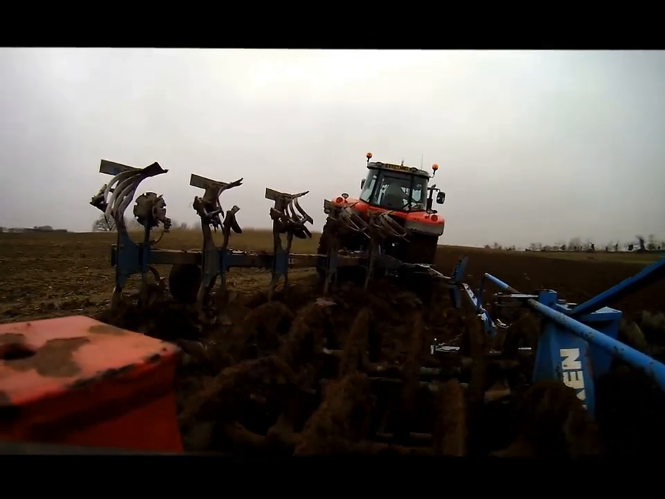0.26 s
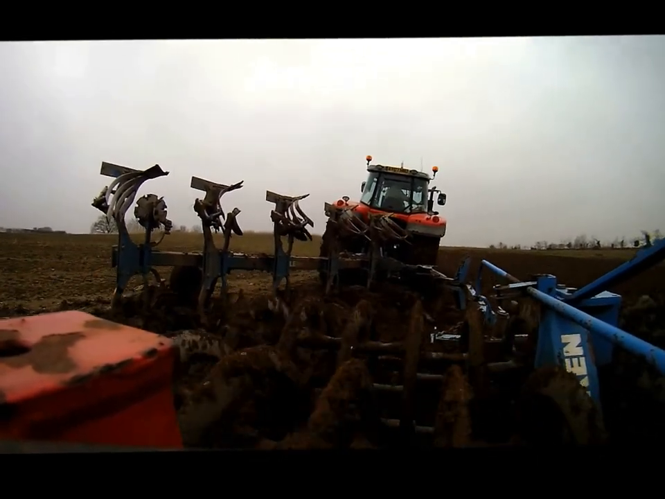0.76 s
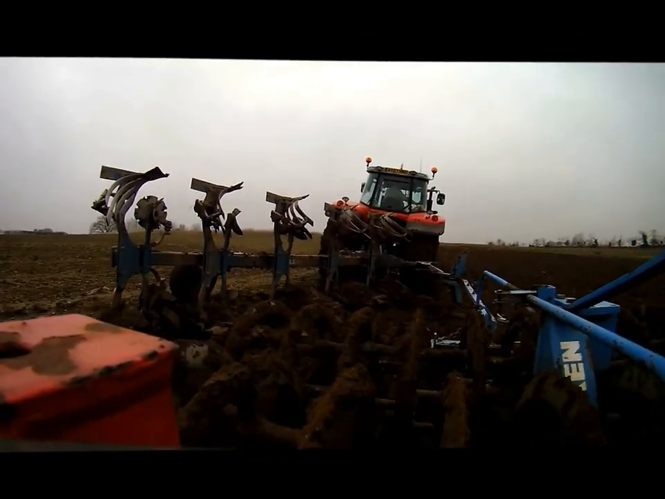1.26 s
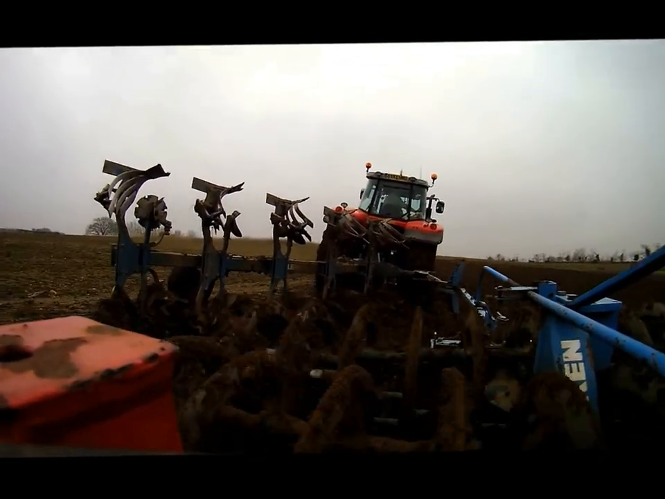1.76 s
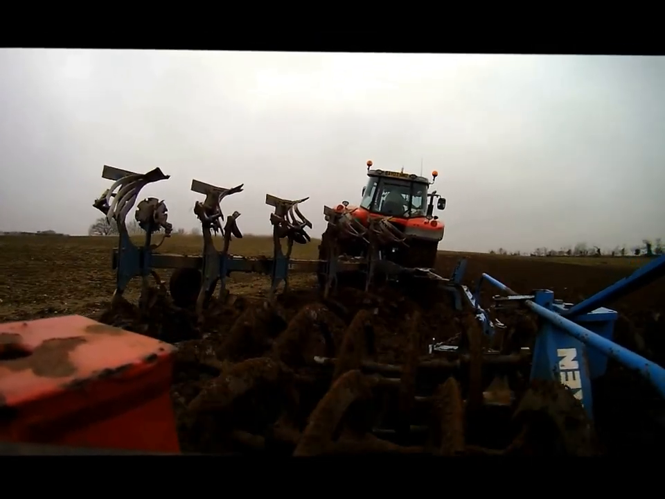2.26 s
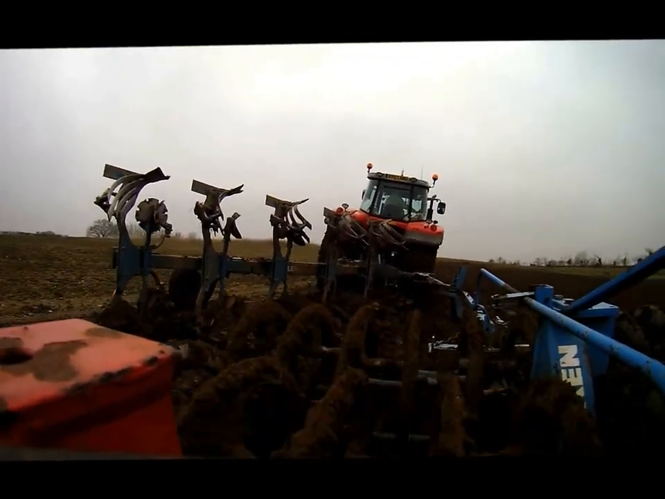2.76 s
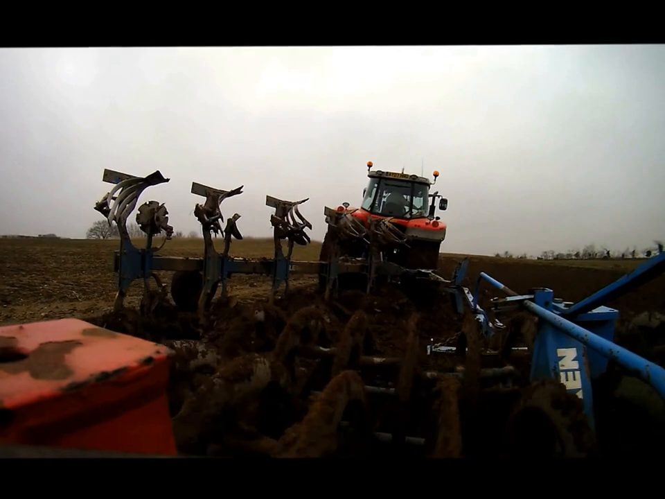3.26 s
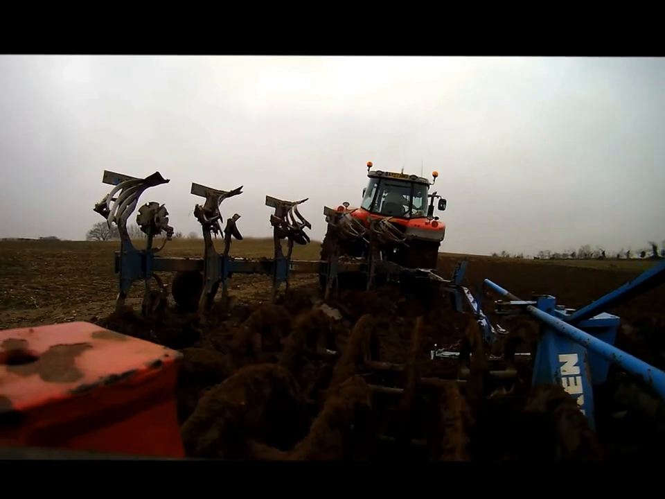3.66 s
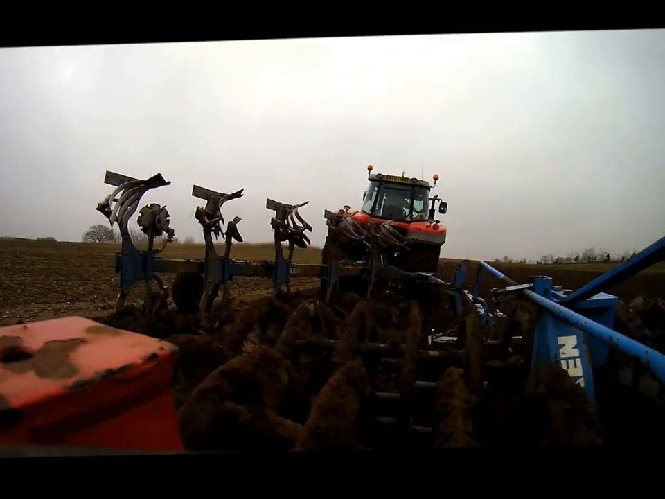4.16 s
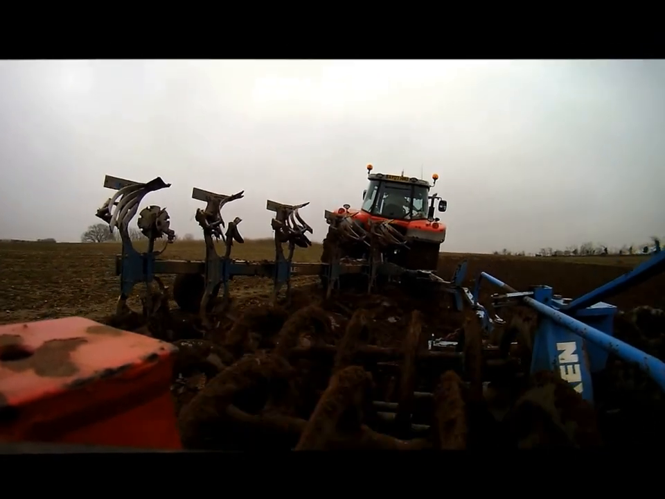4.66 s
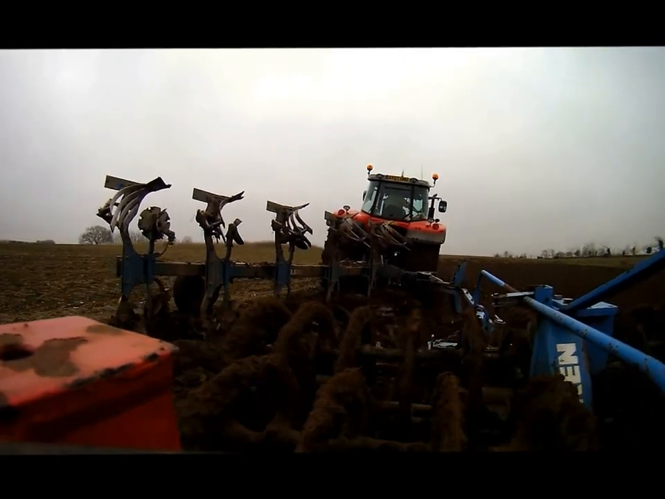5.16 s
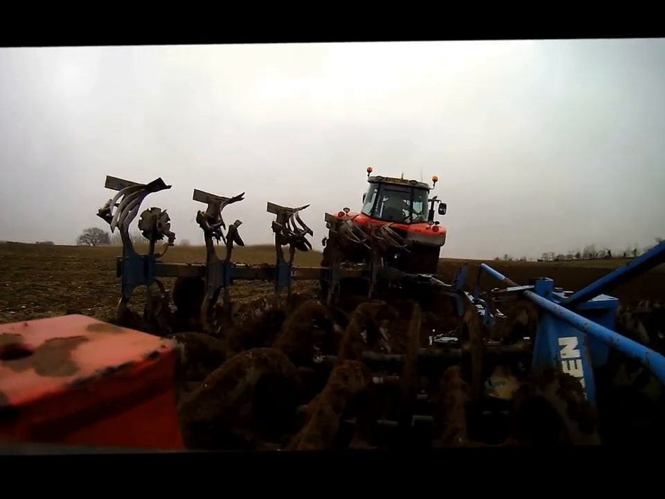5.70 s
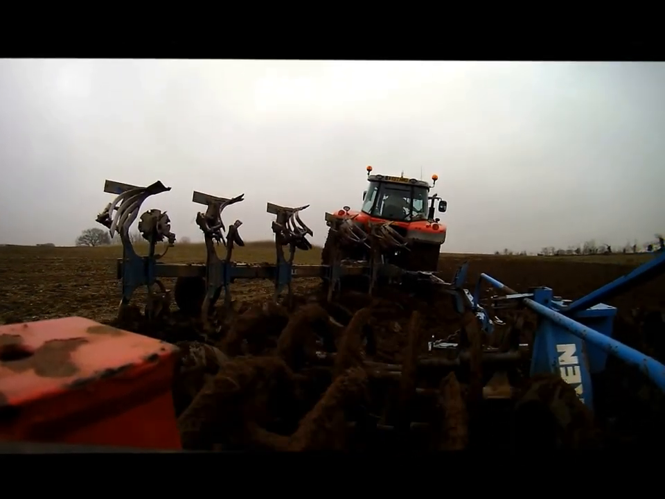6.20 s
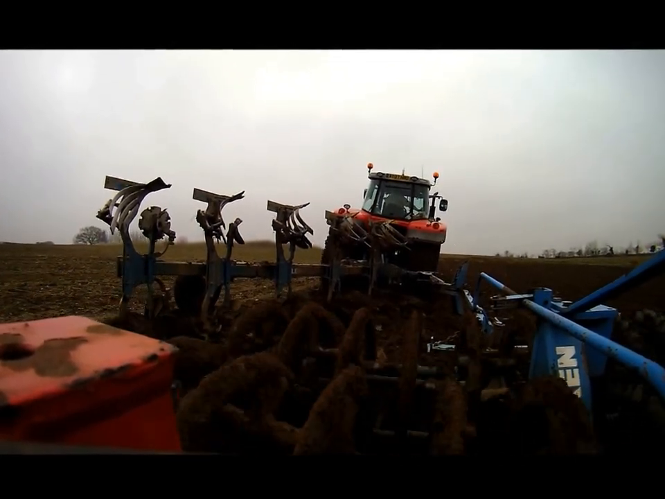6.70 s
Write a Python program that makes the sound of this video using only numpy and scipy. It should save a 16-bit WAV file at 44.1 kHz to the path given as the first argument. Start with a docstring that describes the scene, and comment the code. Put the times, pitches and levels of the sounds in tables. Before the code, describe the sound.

Heard through a steel farm frame rolling over ploughed earth: throbbing bass hum, crumbly grinding, scattered clanks and a single overloaded bang.

```python
"""A low, surging drone runs throughout under grinding soil and scattered knocks, with one hard, overloaded slam
about a third of the way in: a camera clamped to the steel frame of a furrow press hears mostly through its mount
as the rings roll over ploughed soil.
Two wavering near-sines make the drones, and coloured noise and clicks make the soil, thuds and snaps.
Knocks ring the modes of the frame with short bursts of chatter."""
import sys
import numpy as np
from scipy import signal
from scipy.fft import rfft, irfft, next_fast_len
from scipy.io import wavfile
from scipy.ndimage import uniform_filter1d

SR = 44100
rng = np.random.default_rng(int(sys.argv[2]) if len(sys.argv) > 2 else 0)


def linear_from_db(decibels):
    """Turn decibels (scalar or array-like) into linear amplitude factors; 0 gives 1."""
    return 10 ** (np.asarray(decibels, float) / 20)


def unload_audio(sound):
    """Save the sound as a 16-bit wav file, at the path given as the first command line argument."""
    columns = np.transpose(np.atleast_2d(sound))
    # keep every value between -1 and 1, then stretch to whole-number steps
    steps = np.round(np.clip(columns, -1, 1) * 32767)
    wavfile.write(sys.argv[1], SR, steps.astype(np.int16))


N = 306054

# What the frame and housing ring with.
# Each row: pitch in Hz, relative level in dB, basic time to fall by 60 dB in seconds.
FRAME = [(526, 2.5, 0.24), (581.5, -2.5, 0.21), (750, -22, 0.02), (750, -8.5, .05), (997, 5, 0.25),
         (956, 13.5, 0.078), (1120, -21.5, .08), (1286, -18, 0.066), (1300, -14, 0.087), (1370, 10, 0.15),
         (1400, 7, 0.2), (1448, 15.5, 0.059), (1530, 19, 0.12), (1570, -8, 0.092), (1748, 5.5, 0.066),
         (1838, -3.5, 0.088), (2130, -4, 0.089), (2240, -6.5, 0.092), (2482, -6, 0.2), (2745, -5, 0.055),
         (2988, -2.5, 0.18), (3019, 2, 0.13), (3263, -7, 0.097), (3387, -5.5, 0.22), (3514, -2, 0.16),
         (3778, 0, 0.038), (3975, -24, 0.026), (4400, -14.5, 0.1), (4616, -13.5, .22), (4890, -16.5, 0.11),
         (5390, -19, 0.12)]
# Tone colour of the low rumble through the housing.
# Each row: frequency in Hz, relative level in dB per Hz.
RUMBLE_COLOUR = [(12, -53.5), (20, -12), (73, -6), (95, -13), (119, -16), (146, -16.5), (243, -17),
                 (302, -13), (365, -41.5), (420, -48), (550, -66), (920, -120)]


def curve(table):
    """Draw straight lines between the rows of a table, giving each column sample by sample."""
    seconds, *columns = np.transpose(table)
    return [np.interp(np.arange(N) / SR, seconds, column) for column in columns]


def unit(x):
    """Scale a sound to an rms of 1."""
    return x / np.sqrt(np.mean(x ** 2))


def decay(t, t60):
    """Die away steadily, by 60 dB in t60 seconds."""
    return np.exp(-np.log(1000) * t / t60)


def colour(x, points):
    """Shape the spectrum of a sound by points of (Hz, dB)."""
    hz, db = np.transpose(points)
    size = next_fast_len(len(x))
    f = np.maximum(np.arange(size // 2 + 1) * SR / size, 1)
    gain = linear_from_db(np.interp(np.log(f), np.log(hz), db))
    return irfft(rfft(x, size) * gain, size)[:len(x)]


def walk(rate):
    """Wander at random with rms 1: a new value each 1 / rate seconds, smoothed twice."""
    hold = int(SR / rate)
    steps = np.repeat(rng.standard_normal(N // hold + 1), hold)
    smooth = uniform_filter1d(uniform_filter1d(steps, hold), hold)
    return unit(smooth[:N])


def grains(per_s, spread_db):
    """Scatter clicks at random, most of them small and a few large."""
    clicks = (rng.random(N) < per_s / SR) * rng.standard_normal(N)
    return unit(clicks * linear_from_db(spread_db * rng.exponential(size=N)))


def surges(table, rise_s, fall_s):
    """Let each surge swell, sag for its length and then die away smoothly."""
    out = np.zeros(N + SR)
    t = np.arange(SR // 2) / SR
    for start, length, db, sag in table:
        rise = np.sin(np.pi / 2 * np.minimum(t / rise_s, 1)) ** 2
        fall = np.exp(-(np.maximum(t - length, 0) / fall_s) ** 2)
        i = int(start * SR)
        out[i:i + len(t)] += linear_from_db(db - sag * np.minimum(t, length)) * rise * fall
    return out[:N]


def drone(hz, size, waver_rad, waver_db, rate):
    """A mode of the mount fed by jolts: a near sine whose phase and loudness waver."""
    phase = 2 * np.pi * hz * np.arange(N) / SR + waver_rad * walk(rate)
    loudness = size * linear_from_db(waver_db * walk(rate))
    return np.sqrt(2) * loudness * np.sin(phase)


def idling(hz, width_hz, db):
    """Small jolts keep a mode idling: steady noise passed twice through its resonance."""
    peak = signal.iirpeak(hz, hz / width_hz, fs=SR)
    once = signal.lfilter(*peak, rng.standard_normal(N))
    return linear_from_db(db) * unit(signal.lfilter(*peak, once))


def sway():
    """The mount sways on its clamp, its lowest mode droning in surges over a faint idling."""
    # Surges of the swaying mount.
    # Each row: start in seconds, length in seconds, level in dB, sag in dB per second.
    sway_surges = [(0.0, 0.12, -26.5, 5), (0.15, 0.17, -28, -14), (0.38, 0.041, -28, 10),
                   (0.47, 0.33, -21.5, 3), (0.84, 0.062, -34, 5), (1.02, 0.11, -28.5, -22),
                   (1.27, 0.26, -33.5, 7), (1.51, 0.22, -23, 26), (1.79, 0.058, -28.5, 3),
                   (2.02, 0.22, -25, -48), (2.26, .06, -13.5, 60), (2.35, 0.074, -19, 5),
                   (2.47, 0.26, -21.5, 52), (2.68, 0.11, -22.5, 12), (2.91, 0.084, -26.5, -18),
                   (3.05, 0.22, -20.5, 14), (3.25, 0.19, -6.5, 94), (3.48, 0.216, -22, 36),
                   (3.71, 0.078, -21.5, 11), (3.84, 0.052, -23.5, 8), (3.92, .07, -27.5, 7),
                   (4.01, 0.23, -20.5, 8), (4.3, 0.21, -14, 53.5), (4.55, .16, -26, 7),
                   (4.72, 0.14, -22.5, 9), (4.92, 0.16, -19.5, 19), (5.11, 0.074, -27, 8),
                   (5.25, 0.12, -19, 38), (5.39, 0.29, -16.5, 14), (5.74, 0.27, -18.5, 6.5),
                   (6.04, 0.19, -15, 28.5), (6.24, 0.21, -20, 15), (6.46, 0.051, -28, 11),
                   (6.52, 0.13, -18.5, 15.5), (6.72, 0.15, -24, 37)]
    size = surges(sway_surges, rise_s=0.035, fall_s=0.028)
    tone = drone(91.5, size, waver_rad=0.35, waver_db=0.82, rate=14)
    return tone + idling(92, width_hz=16, db=-36)


def hum():
    """The housing hums at its stiffer mode, in quicker surges over a faint idling."""
    # Surges of the humming housing.
    # Each row: start in seconds, length in seconds, level in dB, sag in dB per second.
    hum_surges = [(0.0, 0.017, -25, 198), (0.14, 0.18, -36, 5), (0.445, 0.043, -26.5, 52),
                  (0.52, 0.14, -28, 19), (0.76, 0.044, -29.5, 51), (0.83, 0.18, -14.5, 200),
                  (1.2, .16, -27.5, 40), (1.375, 0.14, -27, 83), (1.47, 0.066, -28.5, 156),
                  (1.595, .04, -33, 157), (1.665, .14, -19.5, 134), (1.835, 0.019, -44, 50),
                  (2.01, 0.19, -39, 30), (2.11, 0.079, -13.5, 159), (2.205, 0.066, 5.5, 137),
                  (2.29, 0.067, -17.5, 96), (2.455, 0.048, -28.5, 1), (2.8, 0.085, -37.5, 23),
                  (3.05, 0.06, -33.5, 39.5), (3.275, 0.04, -16, 196.5), (3.345, 0.076, -31, -8),
                  (3.445, 0.095, -30, 82), (3.82, 0.037, -35, 83), (4.05, 0.024, -32.5, 6),
                  (4.44, 0.065, -28, 62), (4.62, 0.14, -33.5, -15), (4.98, 0.047, -36.5, 49.5),
                  (5.2, 0.024, -34, 5), (5.37, 0.019, -31, 53), (5.49, 0.096, -34, 49.5),
                  (5.84, 0.11, -28, 40.5), (6.35, 0.047, -30.5, 7.5), (6.46, 0.063, -34.5, 29),
                  (6.55, 0.017, -29.5, 104), (6.685, 0.08, -30, 42)]
    size = surges(hum_surges, rise_s=0.0097, fall_s=0.014)
    tone = drone(291.1, size, waver_rad=0.4, waver_db=1.03, rate=30)
    return tone + idling(300, width_hz=30, db=-39.5)


def soil():
    """Clods rumble under the rings; crumbs grind along them and small stones tick single modes of the frame."""
    # The rolling load on the rings. Each row: time in seconds, thumping in dB within 120-250 Hz,
    # grinding in dB within 800-2500 Hz.
    rolling_load = [(0.0, -40.5, -39.5), (0.39, -49, -41), (0.6, -43.5, -39), (0.8, -45, -42),
                    (1.45, -45.5, -41.5), (1.68, -40, -37.5), (1.85, -54, -44), (2.05, -46.5, -38.5),
                    (2.2, -41, -25), (2.3, -42, -39), (2.45, -48.5, -40.5), (2.74, -43.5, -41.5),
                    (3.2, -53, -40.5), (3.58, -47, -42), (4.4, -47.5, -42.5), (4.9, -46, -40.5),
                    (5.4, -48, -42.5), (6.94, -45.5, -42)]
    # Tone colour of the grinding. Each row: frequency in Hz, relative level in dB per Hz.
    grind_colour = [(190, -23.5), (330, 1.5), (357, -28.5), (382, -12), (601, -8), (715, -25.5), (959, -14),
                    (1510, -6), (1640, -12.5), (2540, -18), (2790, -23), (3020, -22.5), (3230, -27.5),
                    (4820, -32), (8000, -54), (10400, -78), (17600, -120)]
    thump_db, grind_db = curve(rolling_load)
    thump = unit(colour(grains(1600, 0.48), RUMBLE_COLOUR))
    flicker_db = 0.4 * walk(12) + 1.3 * walk(70)
    crumbs = unit(colour(rng.standard_normal(N) * linear_from_db(flicker_db), grind_colour))
    t = np.arange(SR // 3) / SR
    ticks = np.zeros(N)
    for hz, db, t60 in FRAME:
        # these ticks die away sooner than the basic time of the mode
        ring = linear_from_db(db) * decay(t, 0.66 * t60) * np.sin(2 * np.pi * hz * t)
        ticks += signal.fftconvolve(grains(90, 3.13), ring)[:N]
    grind = crumbs + linear_from_db(-9.0) * unit(ticks)
    # each whole sound is louder than the band its level is given for
    return linear_from_db(thump_db + 13.5) * thump + linear_from_db(grind_db + 2.0) * grind


def knocks():
    """Loose steel chatters for a moment at each knock and rings every mode in its own share."""
    # Knocks in the frame. Each row: start in seconds, peak of the low modes in dB,
    # peak of the middle modes in dB, peak of the high modes in dB, favoured pitch in Hz.
    knock_list = [(0.185, -63, -24, -60, 1540), (0.29, -31.5, -34, -33.5, 1370),
                  (0.439, -46, -21.5, -43, 1570), (0.483, -30.5, -23, -43.5, 990),
                  (0.527, -20, -18.5, -57, 1300), (0.555, -19.5, -29, -56.5, 1200),
                  (0.579, -22.5, -25.5, -61, 1060), (0.61, -28.5, -36, -55, 1300),
                  (0.755, -53, -27, -37.5, 1480), (0.771, -34, -33, -43.5, 1540),
                  (0.812, -40.5, -28, -34, 1530), (0.835, -20.5, -16, -60, 1360),
                  (0.971, -27.5, -26.5, -29.5, 1530), (1.16, -43, -31.5, -31.5, 1360),
                  (1.224, -27.5, -30, -39.5, 1270), (1.485, -32, -41, -56, 1400),
                  (1.558, -43, -23.5, -40, 1540), (1.63, -28, -24.5, -35, 1530),
                  (1.659, -36, -21, -33, 1570), (1.695, -40, -31, -42, 1500), (1.761, -34, -30, -33, 1520),
                  (2.029, -43, -33, -35, 1550), (2.057, -24, -17.5, -35.5, 1400),
                  (2.084, -42, -30, -33, 1520), (2.106, -21.5, -13.5, -39.5, 1100),
                  (2.111, -9, 1, -27.5, 1557), (2.14, -32, -23, -39, 1380), (2.158, -21, -17, -28, 1390),
                  (2.176, -26.5, -16, -24.5, 1450), (2.196, -6, 7, -2.5, 1390),
                  (2.205, 3.5, 11.5, 9.5, 1400), (2.22, -8, 10.5, 0.5, 1356), (2.245, -13, 0.5, -11, 1370),
                  (2.377, -19, -21, -26, 990), (2.423, -47, -24.5, -49.5, 1350),
                  (2.461, -37, -24, -28, 1340), (2.623, -50.5, -29, -58, 1520),
                  (2.72, -34.5, -20.5, -36.5, 1250), (2.993, -22.5, -17.5, -30.5, 1560),
                  (3.121, -41, -31, -34, 1530), (3.239, -18, -15, -39, 940),
                  (3.264, -20.5, -16.5, -36, 1540), (3.291, -40.5, -24, -26.5, 1490),
                  (3.602, -25, -24, -27.5, 1610), (3.789, -38, -53, -39, 1150),
                  (4.057, -55, -32, -56, 1250), (4.458, -46, -26, -27.5, 1544),
                  (4.708, -43, -19.5, -42, 1500), (4.77, -46, -27, -38.5, 1490),
                  (4.849, -26.5, -22.5, -56.5, 1370), (5.094, -49, -28.5, -40, 1590),
                  (5.199, -41, -39, -39, 1520), (5.369, -37, -28.5, -40.5, 1010),
                  (5.878, -30, -29, -42, 1430), (6.01, -34, -37, -39.5, 1340), (6.273, -56, -34, -28, 1530),
                  (6.51, -29.5, -50, -38.5, 1350), (6.567, -31.5, -34.5, -36, 1330)]
    out, t = np.zeros(N + SR), np.arange(SR // 3) / SR
    hz, db, t60 = np.transpose(FRAME)[:, :, None]
    # low modes reach up to 750 Hz, high ones start above 2400 Hz
    group = (hz > 750).astype(int) + (hz > 2400)
    members = (group.T == np.arange(3)[:, None]).astype(float)
    # the housing soaks up the first energy fast, then the steel rings on
    fade = decay(t, t60) * (0.18 + np.exp(-t / 0.006))
    # a blunt contact takes 2 ms to push, which keeps the knock dull on top
    fade = fade * np.sin(np.pi / 2 * np.minimum(t / 0.002, 1)) ** 2
    contact = t[:SR // 20]
    pressure = np.exp(-(contact / 0.017) ** 2)
    chance = rng.standard_normal((len(knock_list), 2, len(FRAME), 1))
    chatter = rng.standard_normal((len(knock_list), 3, len(contact))) * pressure
    chatter[:, :, 0] = 19  # the first blow stands out
    for (start, *peak_db, spot_hz), (size, detune), blows in zip(knock_list, chance, chatter):
        # the spot that is struck favours the middle modes near one pitch
        spot_db = -np.minimum(25 * np.abs(np.log(hz / spot_hz)), 12) * (group == 1)
        size_db = 2.5 * size
        tone = np.sin(2 * np.pi * hz * (1 + 0.0068 * detune) * t)
        modes = linear_from_db(db + spot_db + size_db) * fade * tone
        rung = signal.fftconvolve(members @ modes, blows, axes=1)[:, :len(t)]
        # bring each group of modes to its own peak
        gains = linear_from_db(np.array(peak_db)) / np.abs(rung).max(1)
        i = int(start * SR)
        out[i:i + len(t)] += gains @ rung
    return out[:N]


def thuds():
    """The rings bump over hard clods, each bump a dull noise burst in the colour of the rumble."""
    # Bumps over hard clods. Each row: start in seconds, level in dB,
    # time to fall by 60 dB in seconds before it is limited below.
    thud_list = [(0.104, -37, 0.12), (0.362, -21.5, 0.34), (0.524, -22.5, 0.47), (0.757, -22.5, 0.18),
                 (0.829, -14.5, 0.14), (1.599, -16.5, 0.18), (2.109, -18.5, 0.19), (2.149, -10.5, 0.2),
                 (2.2, 1.5, 0.26), (2.442, -24, 0.46), (3.147, -23.5, 0.23), (3.262, -9.5, 0.13),
                 (3.503, -38, 0.23), (3.652, -31.5, 0.2), (5.889, -27, 0.22), (6.241, -27, 0.24),
                 (6.345, -18.5, 0.17), (6.658, -36, 0.2)]
    out, t = np.zeros(N + SR), np.arange(SR // 3) / SR
    bursts = rng.standard_normal((len(thud_list), 2 * len(t)))
    for (start, db, t60), burst in zip(thud_list, bursts):
        fade = decay(t, np.clip(t60, 0.03, 0.4)) * (1 - np.exp(-t / 0.0023))
        rumble = colour(burst, RUMBLE_COLOUR)
        # hold back the deepest part
        dull = unit(colour(rumble, [(20, -10), (60, -1)]))[:len(t)]
        i = int(start * SR)
        out[i:i + len(t)] += linear_from_db(db) * dull * fade
    return out[:N]


def snaps():
    """Dry clods snap under the rings as short puffs of noise; fainter ones crackle at random."""
    # Snapping clods. Each row: start in seconds, level in dB.
    snap_list = [(0.29, -48), (0.4844, -44), (0.7536, -47), (1.5591, -41), (1.6589, -57), (2.9138, -44.5),
                 (3.8656, -43), (3.9757, -45), (4.0582, -45.5), (4.7739, -46), (4.8986, -57), (5.0957, -43),
                 (5.4311, -48.5), (5.8716, -49), (6.5086, -43.5)]
    # Tone colour of a snap. Each row: frequency in Hz, relative level in dB per Hz.
    snap_colour = [(500, -29.5), (1000, -4.5), (1500, 2.5), (3000, -4), (5000, -6), (7000, -18),
                   (12000, -45.5)]
    crackle_per_s, faintest_db, t60_s = 25, -62.5, 0.04
    crackle = rng.random(N) < crackle_per_s / SR
    starts = linear_from_db(faintest_db) * crackle * linear_from_db(13.0 * rng.random(N))
    for start, db in snap_list:
        starts[int(start * SR)] = linear_from_db(db)
    # each start dies away by 60 dB in t60_s
    size = signal.lfilter([1], [1, -decay(1 / SR, t60_s)], starts)
    return size * unit(colour(rng.standard_normal(N), snap_colour))


def scene():
    """Add up everything that arrives through the mount, in one channel."""
    return (sway() + hum() + soil() + knocks() + thuds() + snaps())[None]


def band_limit(x):
    """A steep low-pass at the top of the band."""
    return signal.sosfilt(signal.butter(12, 15670, fs=SR, output="sos"), x)


def record(dry):
    """The microphone adds a faint steady hiss and clips flat whatever is too loud, as on the slam."""
    hiss = linear_from_db(-70.5) * rng.standard_normal(dry.shape)
    mix = np.clip(dry + hiss, -0.97, 0.97)
    return band_limit(mix)


dry = scene()
out = record(dry)
unload_audio(out)
```